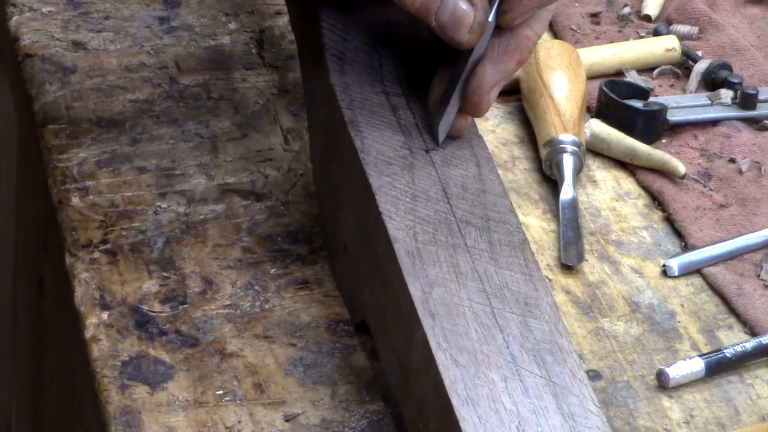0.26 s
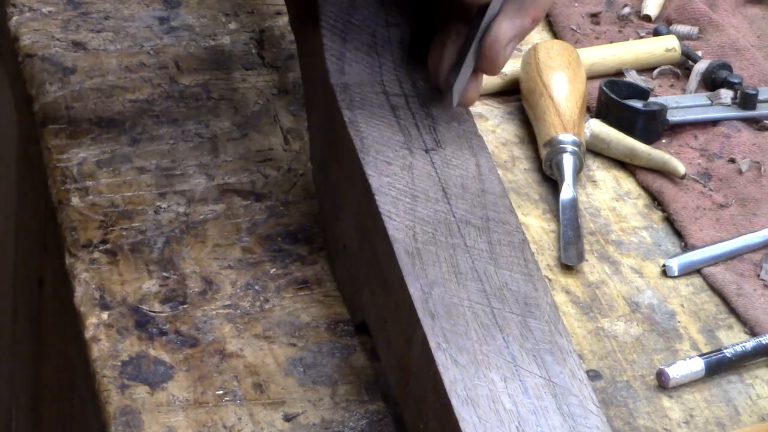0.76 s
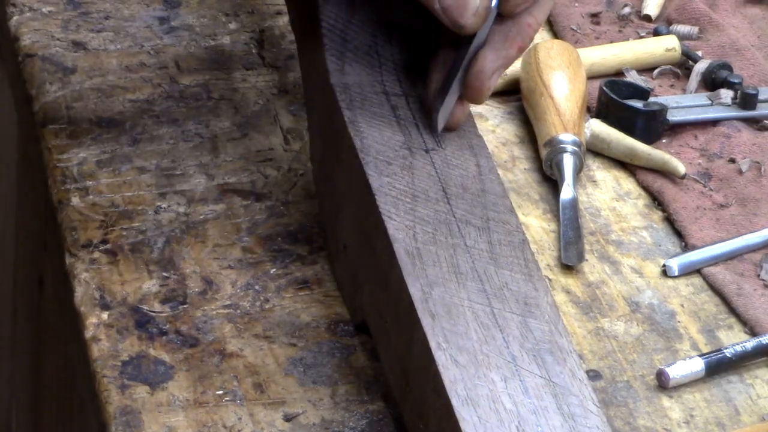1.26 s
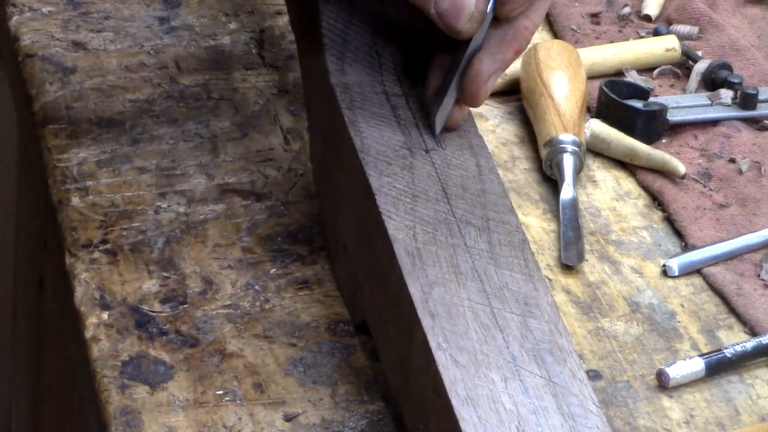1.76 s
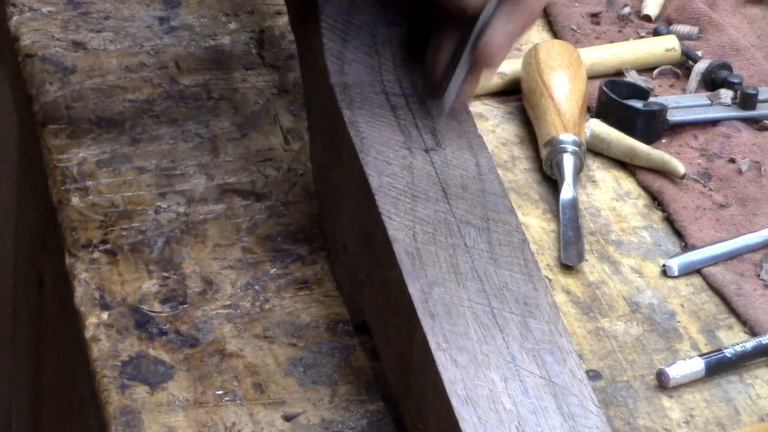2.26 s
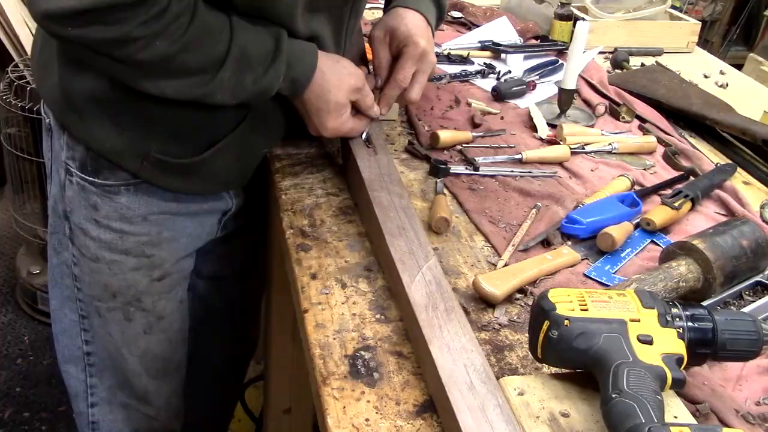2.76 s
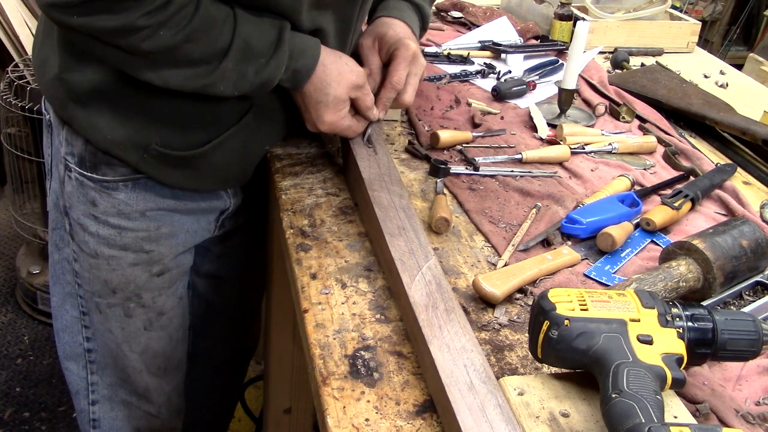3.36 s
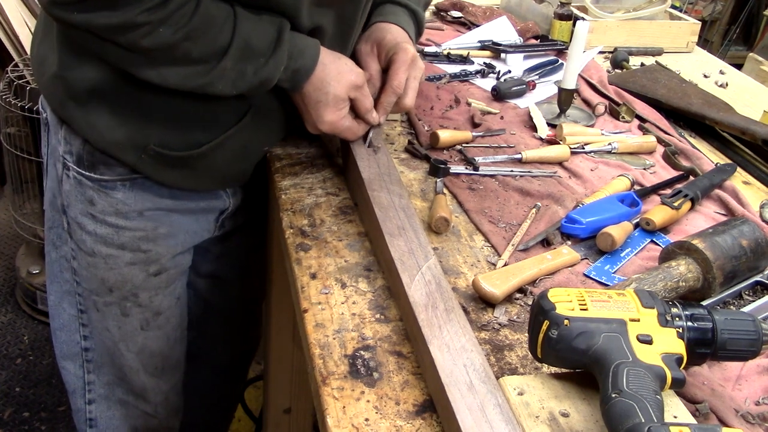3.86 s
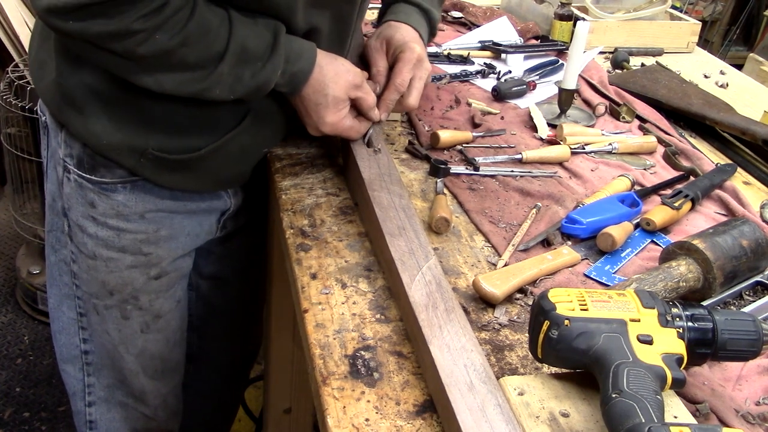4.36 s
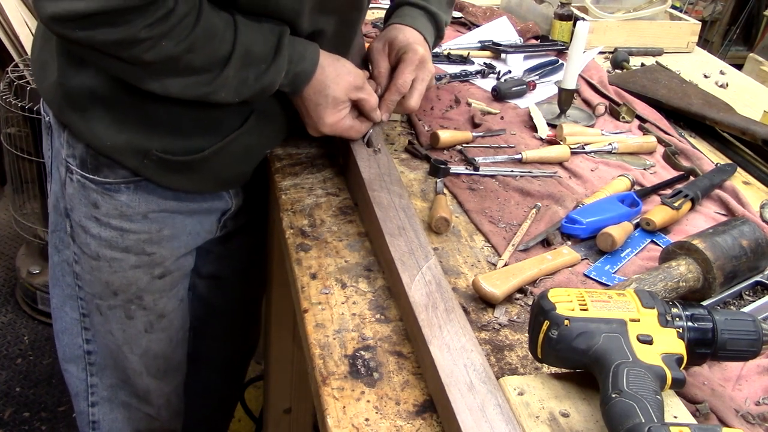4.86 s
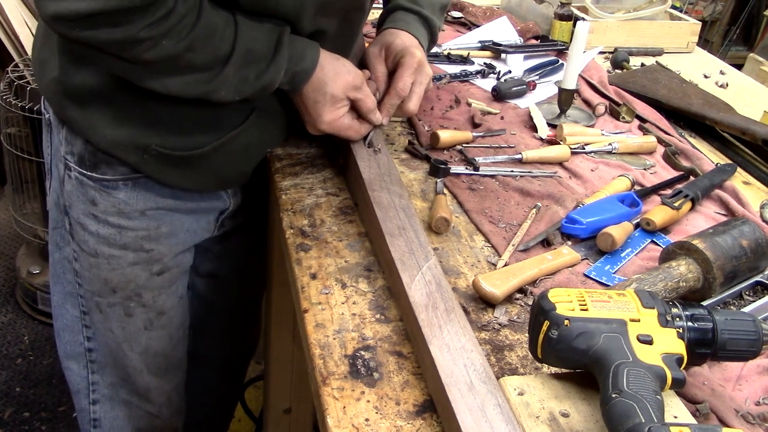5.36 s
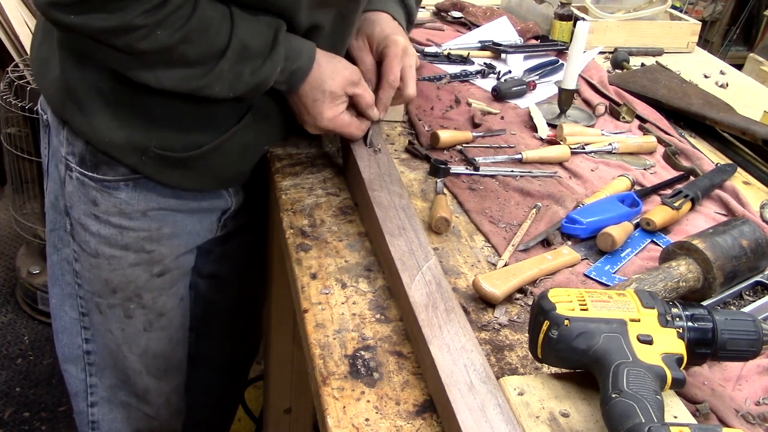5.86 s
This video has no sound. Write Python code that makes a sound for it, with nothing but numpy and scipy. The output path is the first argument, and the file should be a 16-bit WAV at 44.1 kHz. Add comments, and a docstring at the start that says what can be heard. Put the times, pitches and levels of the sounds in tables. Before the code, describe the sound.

Close to a workbench, a hardwood piece drags with a brief rising squeak and ends in a knock. A mallet then hits a chisel twice, about a second and a half apart, each a very loud woody crack with a short ring and rattling steel. After a brief dip come soft taps, scrapes and rubbing hands in a small workshop, over low room air and faint camera noise.

```python
"""A workshop bench close to a camera: wood squeaks along the bench by stick-slip and knocks, then a mallet
drives a small chisel twice into a hardwood blank, exciting its modes and rattling a loose steel tool.
Fingers and hand tools tap and scrape: short pushes of grit convolved with the response of wood and chisel.
Hands rub as coloured noise over room tone; the camera ticks, whines faintly and limits the blows.
The level dips briefly twice, at 0.317 s and 2.807 s."""
import sys
import numpy as np
from scipy import signal
from scipy.fft import rfft, irfft, next_fast_len
from scipy.io import wavfile
from scipy.ndimage import uniform_filter1d, map_coordinates

SR = 44100
rng = np.random.default_rng(int(sys.argv[2]) if len(sys.argv) > 2 else 0)


def to_wav(sig):
    """Store sig (one row per channel, or 1-D mono) as 16-bit WAV at the path in sys.argv[1].

    Samples outside -1..1 are clipped; the rate is SR.
    """
    pcm = np.clip(np.atleast_2d(sig), -1, 1) * 32767
    pcm = np.round(pcm).astype(np.int16)
    wavfile.write(sys.argv[1], SR, pcm.T)  # frames by channels


N = 269671


def amp(db):
    """Decibel law: the gain of a level in dB."""
    return 10 ** (np.asarray(db) / 20)


def unit(x):
    """Power normalisation: x at rms 1."""
    return x / np.sqrt(np.mean(x ** 2) + 1e-20)


def along(points, hz):
    """Logarithmic frequency scale: (frequency, value) points joined by straight lines."""
    f, v = np.transpose(points)
    return np.interp(np.log(hz + 1), np.log(f + 1), v)


def wobble(rate):
    """Random modulation: a smooth curve through `rate` random knots a second."""
    knots = rng.standard_normal(int(N * rate / SR) + 4)
    return map_coordinates(knots, [np.arange(N) * rate / SR])


def filtered(x, response):
    """Linear filtering: x times a complex response of frequency."""
    m = next_fast_len(x.shape[-1] + 8192)
    spectrum = rfft(x, m) * response(np.fft.rfftfreq(m, 1 / SR))
    return irfft(spectrum, m)[..., :x.shape[-1]]


def causal(spectrum):
    """Minimum phase: folding the cepstrum gives a causal response with these levels."""
    def response(hz):
        cepstrum = irfft(np.log(amp(along(spectrum, hz)) + 1e-6))
        half = len(cepstrum) // 2
        cepstrum[1:half] *= 2
        cepstrum[half + 1:] = 0
        return np.exp(rfft(cepstrum))
    return response


def resonances(table):
    """Modal superposition: band-pass resonators of (pitch_hz, width_hz, level_db), signs alternating."""
    def response(f):
        total = 0
        for k, (center, width, db) in enumerate(table):
            damped = 1j * f * width
            total = total + (-1) ** k * amp(db) * damped / (center * center - f * f + damped)
        return total
    return response


def bands(x):
    """Band splitting: the thud, body, knock and click range of x."""
    edges = [(400, "low"), ((400, 1000), "band"), ((1000, 3000), "band"), (3000, "high")]
    parts = []
    for k, (hz, kind) in enumerate(edges):
        sos = signal.butter(2, hz, kind, fs=SR, output="sos")
        # alternate signs keep neighbours in phase where they overlap
        parts.append((-1) ** k * signal.sosfilt(sos, x))
    return parts


def add(track, part, s):
    """Superposition: mix part into track from time s on."""
    seat = track[:, round(s * SR):][:, :part.shape[-1]]
    seat += part[..., :seat.shape[-1]]


# Decay of the shop's reverberation: (pitch_hz [Hz], t60_s [s])
SHOP_DECAY = [(60, 0.55), (200, 0.23), (500, 0.3), (1000, 0.23), (3000, 0.22), (8000, 0.16), (15000, 0.44)]


def shop(seconds):
    """Reverberation: mid and side of a noise tail in which each frequency dies at its own speed."""
    size = round(seconds * SR)
    hz, frames, z = signal.stft(rng.standard_normal((2, size)), SR, nperseg=256)
    decay = amp(-60 * frames / along(SHOP_DECAY, hz)[:, None])
    tail = signal.istft(z * decay, SR, nperseg=256)[1][:, :size]
    return tail * amp([[0], [-22]])


# Spectrum of the room's air noise: (pitch_hz [Hz], level_db [relative dB per Hz])
AIR_COLOUR = [(18, -63), (30, -14), (177, 7.5), (400, 3), (900, -0.5), (2230, -7), (6000, -14.5),
              (11000, -21.5), (15000, -29)]
# Left-right likeness of that noise: (pitch_hz [Hz], likeness [correlation, 0 to 1])
LIKENESS = [(60, 0.61), (240, 0.72), (950, 0.21), (3770, 0.71), (15000, 0.96)]


def room_tone():
    """Diffuse-field coherence: almost steady air noise, partly alike at both ports."""
    def response(hz):
        turn = np.arccos(np.clip(along(LIKENESS, hz), -1, 1)) / 2
        return amp(along(AIR_COLOUR, hz)) * [np.cos(turn), np.sin(turn)]
    mid, side = filtered(rng.standard_normal((2, N)), response)
    return amp(-59 + 1.0 * wobble(3.7)) * unit(np.array([mid + side, mid - side]))


TICK_S, FIRST_TICK_S, TICKS_END_S = .06673, .0434, 2.4  # period, onset and end of the ticks
WHINE_HZ = 15734


def camera():
    """Periodic excitation: a small motor ticks fifteen times a second; a thin whine swells in step."""
    t = np.arange(N) / SR
    since = (t - FIRST_TICK_S) % TICK_S
    burst = amp(-60 * since / .018 + 1.5 * wobble(15)) * (1 - np.exp(-since / .001))
    burst = burst * (t < TICKS_END_S)
    source = np.sin(2 * np.pi * 2150 * since) + 1.6 * rng.standard_normal(N)
    ticks = unit(filtered(burst * source, resonances([(2180, 600, 0), (1450, 300, -8)])))
    swell = 1 - .45 * np.cos(2 * np.pi * (t - FIRST_TICK_S - .012) / TICK_S)
    whine = amp(-72 + .7 * wobble(8)) * swell * np.sin(2 * np.pi * WHINE_HZ * t)
    return amp(-73) * ticks + whine


# Modes of a loose steel tool: (pitch_hz [Hz], width_hz [Hz], level_db [relative dB])
STEEL_MODES = [(6460, 28, 8), (8600, 32, 3.5), (8740, 30, 4), (9680, 58, -5), (10540, 130, -9)]
RATTLE_AFTER_S, RATTLE_RISE_S, RATTLE_T60_S = .026, 0.0049, 0.17


def rattle():
    """Chattering contact: a loose steel tool jumps at each blow; its modes ring over a thin hiss."""
    def tool(hz):
        hiss = 0.13 * (hz > 3000) / (1 + (hz / 10000) ** 4)
        return resonances(STEEL_MODES)(hz) + hiss
    chatter = np.zeros(N)
    for s, _, _, rattle_db in MALLET_BLOWS:
        since = np.maximum(np.arange(N) / SR - s - RATTLE_AFTER_S, 0)
        chatter += amp(rattle_db - 60 * since / RATTLE_T60_S) * np.tanh(since / RATTLE_RISE_S)
    noise = rng.standard_normal(N) * amp(2.9 * wobble(150))
    return chatter * unit(filtered(noise, tool))


# Hands and sleeves rubbing the work: (start_s [s], level_db [dB before the band offsets])
RUB_LEVEL = [(2.82, -65.5), (3.1, -54), (3.23, -52.5), (3.41, -65.5), (3.69, -54.5), (3.84, -44),
             (3.92, -50.5), (4.09, -60.5), (4.44, -60.5), (4.72, -71), (4.92, -49), (5.43, -61.5),
             (5.76, -53.5), (6.11, -58.5)]
# Colour of wood struck or rubbed: (pitch_hz [Hz], level_db [relative dB per Hz])
WOOD_COLOUR = [(24, -42), (40, -55), (162, -23.5), (229, -13), (301, -0.5), (368, -11), (577, -11),
               (1130, -18.5), (1680, -22.5), (2330, -27.5), (8110, -37), (8730, -41), (15500, -57.5)]
# Modes of the chisel: (pitch_hz [Hz], width_hz [Hz], level_db [relative dB])
CHISEL_MODES = [(1350, 50, 0), (1780, 80, -3), (2050, 80, -3), (2450, 90, -7), (3250, 100, -8),
                (4350, 150, -17), (5400, 150, -14)]
# offsets in dB of the thud, body, knock and click range
RUB_BANDS_DB, DRAG_BANDS_DB = [-8, -8.5, -6, -14], [-20, 2.5, -5.5, -11]
DRAG_DB, DRAG_FADES_DB_PER_S = -52.5, 13  # the piece dragged along the bench, until the first dip


def rubbing():
    """Friction noise: uneven grit in the colour of wood and chisel, nearly centred."""
    t = np.arange(N) / SR
    grain = rng.standard_normal((2, N)) * amp(2.5 * wobble(60) + 2.5 * wobble(300))
    wood = causal(WOOD_COLOUR)
    chisel = resonances(CHISEL_MODES)
    mid, side = filtered(grain, lambda hz: wood(hz) * (1 + 3 * chisel(hz)))
    parts = bands(np.array([mid + .35 * side, mid - .35 * side]))
    s, level_db = np.transpose(RUB_LEVEL)
    hands = amp(np.interp(t, s, level_db, left=-120, right=-120))
    drag = amp(DRAG_DB - DRAG_FADES_DB_PER_S * t) * (t < DIPS_S[0])
    out = np.zeros((2, N))
    for rub_db, drag_db, part in zip(RUB_BANDS_DB, DRAG_BANDS_DB, parts):
        level = hands * amp(rub_db) + drag * amp(drag_db)
        out += amp(2.2 * wobble(11)) * level * unit(part)
    return out


# Partials 1 to 4 of the squeak: level_db [relative dB]
PARTIALS_DB = [0, -9, -30, -22]
# The resonance the second partial climbs towards: (pitch_hz [Hz], width_hz [Hz], level_db [relative dB])
SQUEAK_RESONANCE = [(1404, 83, 7)]
# the slip rate climbs as the piece speeds up, then holds until the knock stops it
SLIP_FROM_HZ, SLIP_TO_HZ = 512, 682
SLIP_S, SPEED_UP_S, SLIP_STOP_S = .02, .135, .285
GRIP_S, GRIP_RISE_S = .062, .006  # the squeak catches
SQUEAK_DB, SQUEAK_GROWS_DB_PER_S = -40.5, 8  # before partials, resonance and reverberation


def squeak():
    """Stick-slip: wood slips on wood at an unsteady rate; each partial flutters, the shop smears the glide."""
    t = np.arange(N) / SR
    speed = np.sin(np.pi / 2 * np.clip((t - SLIP_S) / SPEED_UP_S, 0, 1))
    hz = SLIP_FROM_HZ + (SLIP_TO_HZ - SLIP_FROM_HZ) * speed
    phase = 2 * np.pi * np.cumsum(hz * (1 + .006 * wobble(110))) / SR
    grip = (1 + np.tanh((t - GRIP_S) / GRIP_RISE_S)) / 2
    grip = grip * amp(SQUEAK_DB + SQUEAK_GROWS_DB_PER_S * t) * (t < SLIP_STOP_S)
    slips = np.zeros(N)
    for k, db in enumerate(PARTIALS_DB):
        slips += np.sqrt(2) * amp(db + 2.2 * wobble(90)) * np.sin((k + 1) * phase)
    direct = filtered(grip * slips, lambda f: 1 + resonances(SQUEAK_RESONANCE)(f))
    tail = shop(.3)[0]
    reverberant = signal.fftconvolve(direct, tail / np.linalg.norm(tail))[:N]
    return (direct + amp(-6) * reverberant) * (t < DIPS_S[0])


# Modes of blank and bench: (pitch_hz [Hz], level_db [relative dB], t60_s [s])
BENCH_MODES = [(108.35, -30, 1.2), (179.1, -1.5, 0.27), (188.6, -21, 0.19), (300.3, -33.5, 1.6),
               (296.9, 0, 0.38), (326, -1.5, 0.17), (388.3, -7, 0.22), (398, -34, 1.4), (446.2, -2, 0.24),
               (472, -16.5, 0.15), (522.3, -35, 1.6), (550.2, -8, .2), (574, -8.5, 0.26),
               (640, -13.5, 0.18), (676, -15, .22), (729, -19.5, 0.41), (770, -15.5, .2), (1025, -19, .22),
               (1030, -23, 0.067), (1285, -57.5, 0.16), (1314, -16.5, 0.27), (1703, -11, 0.12),
               (1825, -13, 0.26)]


def bench_modes(seconds):
    """Modal decay: one dying sine per row for each mode of blank and bench."""
    t = np.arange(round(seconds * SR)) / SR
    return np.array([amp(db - 60 * t / t60) * np.sin(2 * np.pi * f * t) for f, db, t60 in BENCH_MODES])


# Colour of the first touch: (pitch_hz [Hz], level_db [relative dB])
CRACK_COLOUR = [(40, -28), (120, -14), (280, -2), (500, 0), (760, -2), (1050, -10), (1350, -7), (1800, -3),
                (2300, -19), (3200, -20), (4500, -37), (6800, -27), (9000, -38), (15500, -52)]
ECHO_S, ECHO_DB = .07, -10  # the far wall
LEAD_DB = -5  # the first touch, before the seating impulse


def knock(modes, crack_db, ring_db, spread_db, seat_s=0):
    """Impact response: a crack, the ringing wood, the shop's answer and a dull echo; mid at peak 1."""
    t = np.arange(modes.shape[1]) / SR
    mid, side = filtered(shop(len(t) / SR), causal(WOOD_COLOUR))
    level = np.std(mid[:2000])
    ring = amp(rng.normal(0, spread_db, len(modes))) @ modes
    mid = mid + level * amp(ring_db) * ring * (1 - np.exp(-t / 0.0027))
    echo = uniform_filter1d(mid, size=7) * (1 - np.exp(-t / 0.0074))
    mid = mid + amp(ECHO_DB) * np.pad(echo, (round(ECHO_S * SR), 0))[:len(t)]
    splinter = .16 * amp(-60 * t / 0.018) * rng.standard_normal(len(t))
    splinter[0] = amp(LEAD_DB)
    splinter[round(seat_s * SR)] = 1
    mid = mid * np.clip(t / (seat_s + 1e-9), 0, 1)
    crack = filtered(splinter, causal(CRACK_COLOUR))
    mid = mid + level * amp(crack_db) * crack / np.abs(crack).max()
    tilt = .1 * (mid - np.roll(mid, 1))  # the left port hears it at another angle
    return np.array([mid + side + tilt, mid - side]) / np.abs(mid).max()


KNOCK_SHARE, KNOCK_DB = .45, -1.5  # the knock range lies between click and body
HELD_DB_PER_S = 95  # how much faster the tail dies while hands hold the work


def contact(out, s, push, wood, click_db, body_db, thud_db, ring_db):
    """Convolution: a push drives the wood, band by band, and the chisel; the next dip ends its tail."""
    spike = np.arange(wood.shape[1]) == 0
    varied = [(hz, width, db + rng.normal(0, 2.5)) for hz, width, db in CHISEL_MODES]
    steel = filtered(spike * 1.0, resonances(varied))
    wood = wood * amp(-HELD_DB_PER_S * np.arange(len(spike)) / SR)
    sound = signal.fftconvolve(np.vstack([wood, steel]), push[None], axes=1)
    keep = round((DIPS_S[DIPS_S > s][0] - s) * SR)
    knock_db = click_db + KNOCK_SHARE * (body_db - click_db) + KNOCK_DB
    parts = [*bands(sound[:2]), sound[2:]]
    levels_db = (thud_db, body_db, knock_db, click_db, knock_db + ring_db)
    for part, db in zip(parts, levels_db):
        add(out, amp(db) * part[:, :keep] / np.abs(part).max(), s)


def grit(size):
    """Sparse random excitation: noise in about one sample of twenty."""
    return rng.standard_normal(size) * (rng.random(size) < .05)


# Short contacts: (start_s [s], click_db, body_db, thud_db [dB, peak of each range],
# ring_db [dB, chisel ring over knock])
TAP_CONTACTS = [(0.124, -37, -36, -47, -14), (0.173, -37, -33, -52, -10), (0.1894, -36.5, -41.5, -61, 8),
                (0.2063, -33.5, -45, -55, -8), (0.2588, -24, -27.5, -30.5, 6),
                (0.2791, -22.5, -12.5, -38.5, -8.5), (1.3445, -62, -57, -36.5, -10),
                (2.8517, -39.5, -49, -38.5, -10), (3.023, -40.5, -41, -61, -7),
                (3.0455, -48.5, -59.5, -55, -15), (3.1362, -43.5, -50, -39, -13),
                (3.2715, -45, -60, -45.5, -10), (3.2987, -34, -41, -27, 9), (3.3399, -46, -61, -39, -7.5),
                (3.6177, -44, -51.5, -46, -12), (3.6948, -33, -54, -26, -10),
                (3.7351, -22.5, -23, -53, -30), (3.7779, -41, -29, -49, -10),
                (3.8828, -34.5, -31, -56, -10), (4.0682, -42, -38.5, -41, -6),
                (4.7218, -42, -51.5, -42, -9.5), (4.8162, -50, -56.5, -55, -8), (4.8686, -43, -41, -40, -5),
                (5.003, -40, -60, -55.5, -6), (5.2023, -39.5, -48, -64, -15), (5.3976, -37, -52, -33, -3),
                (5.4095, -27, -37, -32, -14), (5.4337, -32, -39, -39, -12),
                (5.4857, -36.5, -58, -51.5, -10), (5.5782, -49, -40, -49, -16), (5.7144, -38, -78, -63, -8),
                (5.7606, -38, -75, -44.5, -14), (5.8062, -40.5, -24, -49.5, -16),
                (5.8282, -64, -27, -38, -13), (5.8937, -31, -27.5, -43, -13.5),
                (5.9455, -52, -38, -43.5, -5)]
# Sliding contacts: (start_s [s], length_s [s], swell_s [s], click_db, body_db, thud_db
# [dB, peak of each range], ring_db [dB, chisel ring over knock])
SCRAPE_CONTACTS = [(.4, 0.024, 0.0039, -56.5, -47, -67, -19), (.4251, .01, .001, -46, -51, -67, -29.5),
                   (2.27, 0.051, .0067, -40.5, -86, -63, -26), (2.918, 0.068, 0.018, -60, -43.5, -48, -30),
                   (3.3, 0.073, 0.0051, -40.5, -33.5, -34.5, -2),
                   (3.675, 0.049, 0.0014, -37.5, -30, -44, 0.5),
                   (3.738, 0.035, 0.0037, -30.5, -31, -46, -3),
                   (3.878, 0.068, .013, -46.5, -28.5, -39, -23),
                   (4.073, 0.064, 0.0022, -51, -41.5, -46.5, 0.5), (4.618, 0.18, 0.088, -55, -54, -56, 9),
                   (4.725, 0.033, 0.008, -55, -49, -47, 9.5), (4.935, 0.084, 0.024, -43.5, -41.5, -34, 9.5),
                   (5.14, 0.024, 0.023, -49, -47.5, -89, 6), (5.39, 0.047, .014, -37.5, -26, -36, 6.5),
                   (5.586, 0.071, 0.004, -50.5, -42, -53.5, -13), (6.029, 0.099, 0.059, -54, -58, -57.5, 9)]
TAP_S = .28  # length of the wood's response


def taps():
    """Impact and sliding: a tap is one touch amid brief grit; a scrape is grit that swells and slides."""
    out, t = np.zeros((2, N)), np.arange(8000) / SR
    modes = bench_modes(TAP_S)
    for s, *levels_db in TAP_CONTACTS:
        push = .3 * grit(len(t)) * np.exp(-t / .0025)
        push[round(.0015 * SR)] = 1  # grit leads in to the touch
        wood = knock(modes, crack_db=18.5, ring_db=-5.5, spread_db=5.5)
        contact(out, s, push[:900], wood, *levels_db)
    for s, length, swell, *levels_db in SCRAPE_CONTACTS:
        push = grit(len(t)) * np.clip(t / swell, 0, 1) ** 2 * np.clip((length - t) / 0.015, 0, 1)
        wood = knock(modes, crack_db=18, ring_db=-1.5, spread_db=6.5)
        contact(out, s, push[:round(length * SR)], wood, *levels_db)
    return out


# Mallet blows: (start_s [s], level_db [dB, before treble filter and limiter],
# treble_db [dB, at 8 kHz and above], rattle_db [dB, level the tool's rattle decays from])
MALLET_BLOWS = [(0.4605, 9.5, -11, -34.5), (2.072, 8.5, -16, -29.5)]
BLOW_S = 1.2  # length of the blow's response
SEAT_S = .0016  # the chisel bites a moment after the mallet's first touch


def mallet():
    """Repeated impact: both blows land on the same spot and excite the same modes, so they ring alike."""
    out = np.zeros((2, N))
    blow = knock(bench_modes(BLOW_S), crack_db=16, ring_db=-2, spread_db=1, seat_s=SEAT_S)
    for s, db, treble_db, _ in MALLET_BLOWS:
        add(out, amp(db) * filtered(blow, causal([(2000, 0), (8000, treble_db)])), s)
    return out


def scene():
    """Superposition: work on the bench, a shade to the left, over room tone and camera."""
    work = mallet() + taps() + squeak() + rubbing() + rattle()
    return work * amp([[.25], [-.25]]) + room_tone() + camera()


# Centres of the brief level dips: start_s [s]; the last lies past the end
DIPS_S = np.array([.317, 2.807, 7])
FADE_OUT_S, FADE_IN_S, FADE_POWER, FADE_FLOOR_DB = .036, .027, 1.5, -42
RELEASE_DB_PER_S = 210
TOP_HZ = 15900


def record(dry):
    """Dynamic compression: a limiter with steady release, clipping, a fade at each dip, a band limit."""
    t = np.arange(N) / SR
    over_db = np.maximum(20 * np.log10(np.abs(dry).max(0) + 1e-9) + 0.5, 0)
    release_db = RELEASE_DB_PER_S * t
    duck_db = np.maximum.accumulate(over_db + release_db) - release_db
    pole = np.exp(-1 / (0.002 * SR))  # the gain follows within a few ms
    duck_db = signal.lfilter([1 - pole], [1, -pole], duck_db)
    away = np.min([np.maximum((dip - t) / FADE_OUT_S, (t - dip) / FADE_IN_S) for dip in DIPS_S], axis=0)
    fader = np.clip(away ** FADE_POWER, amp(FADE_FLOOR_DB), 1)
    limited = np.clip(dry * amp(-duck_db), -.96, .96)
    return filtered(limited * fader, lambda hz: hz < TOP_HZ)


dry = scene()
out = record(dry)
to_wav(out)
```